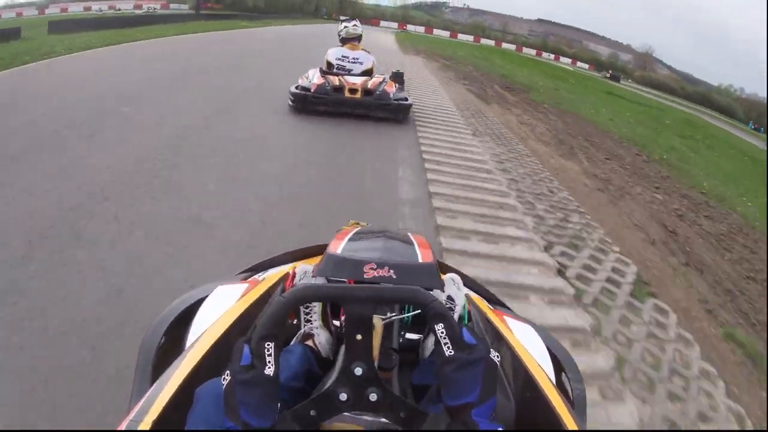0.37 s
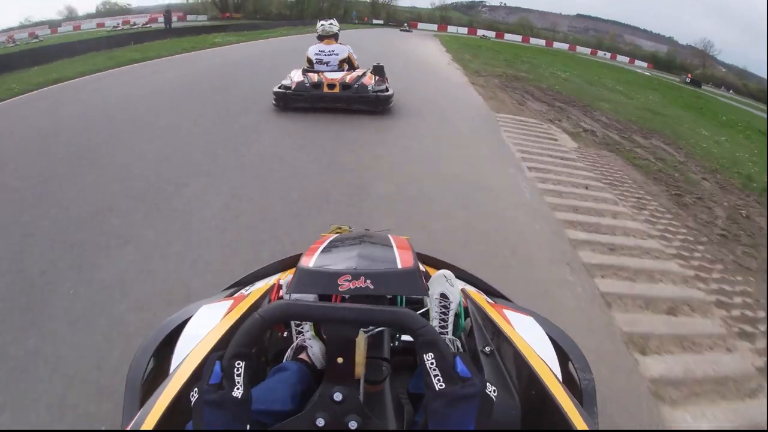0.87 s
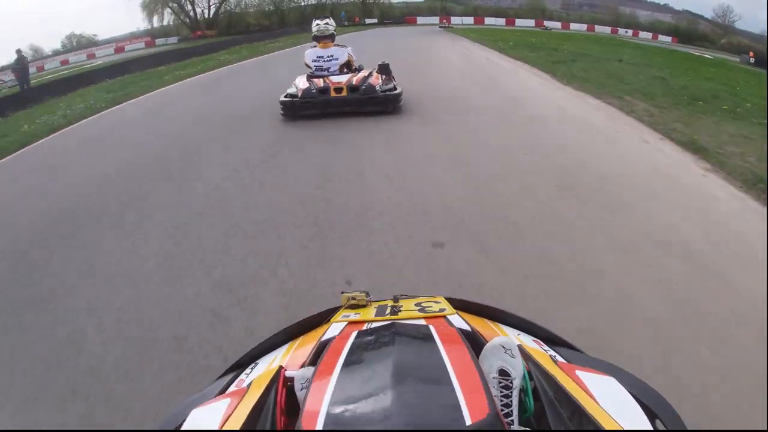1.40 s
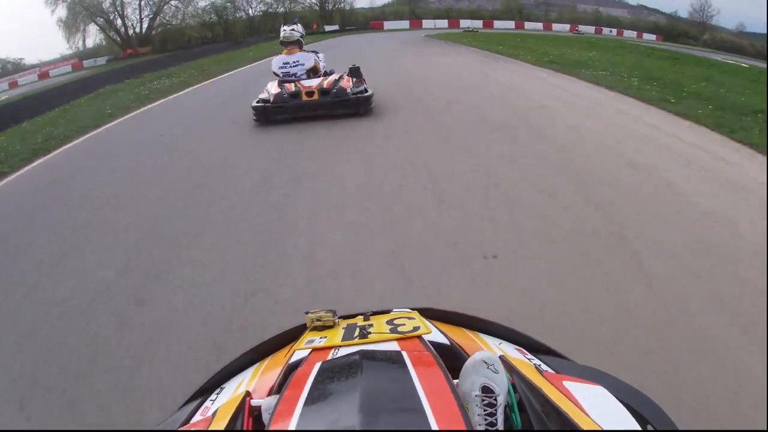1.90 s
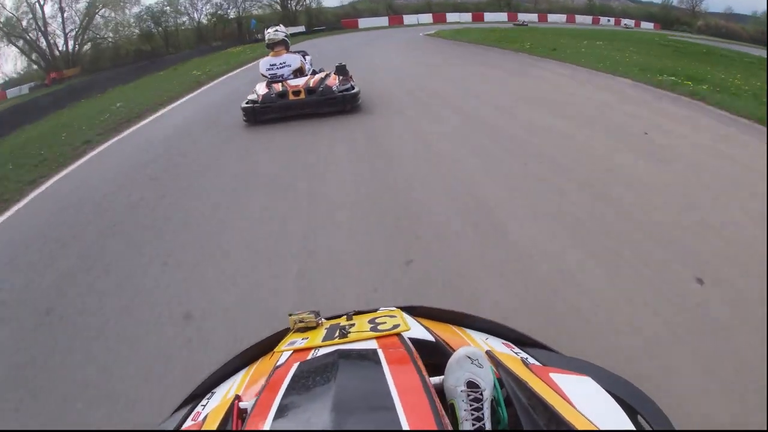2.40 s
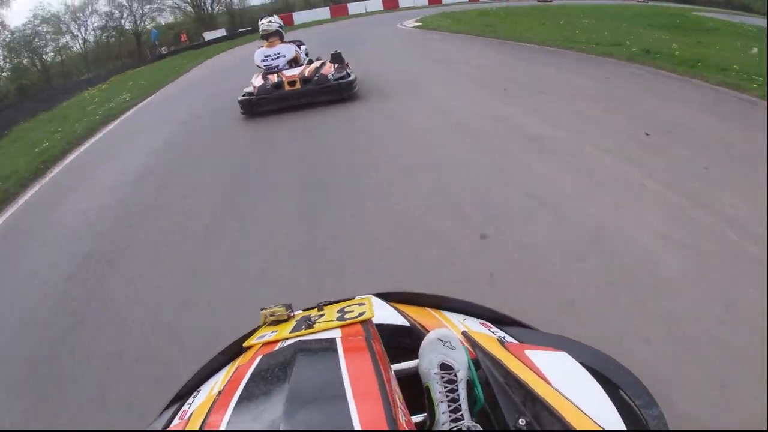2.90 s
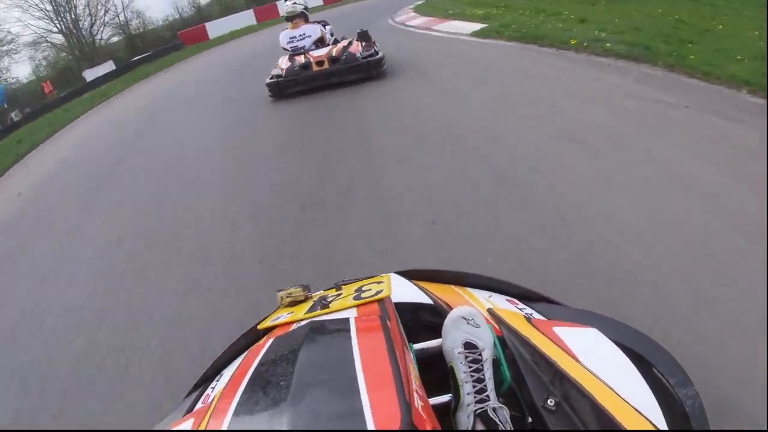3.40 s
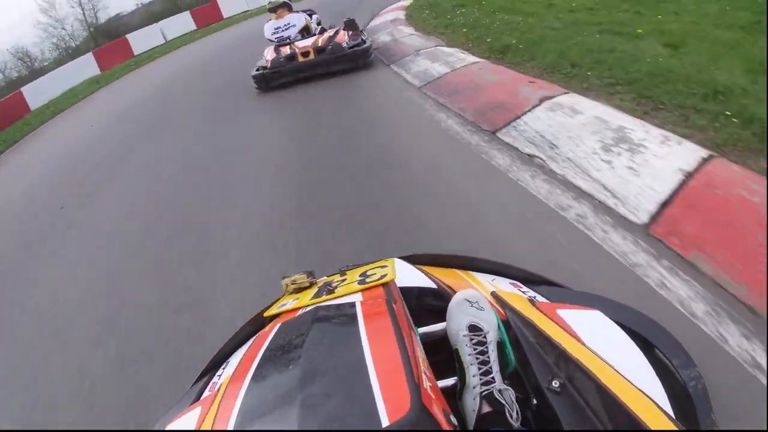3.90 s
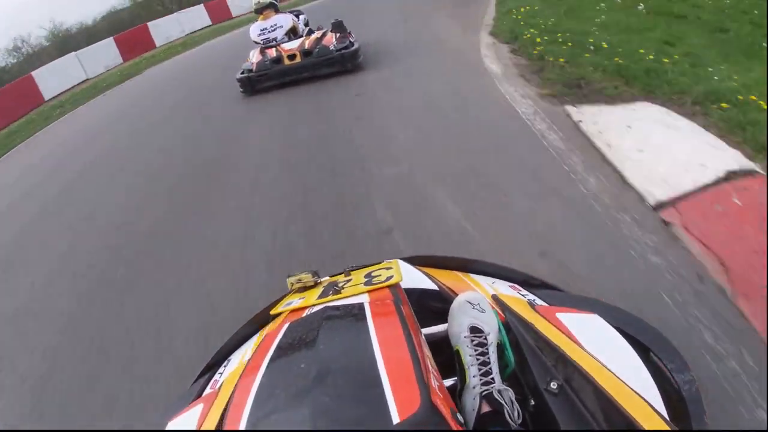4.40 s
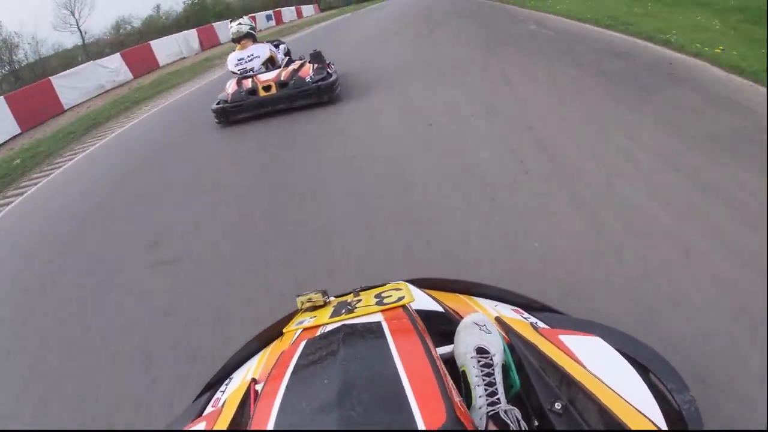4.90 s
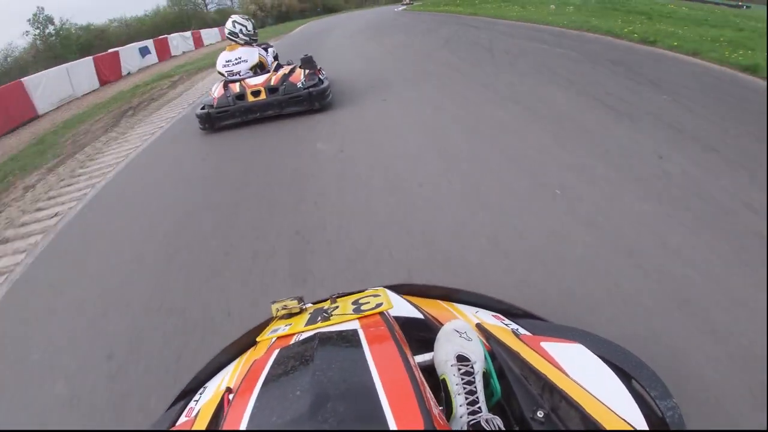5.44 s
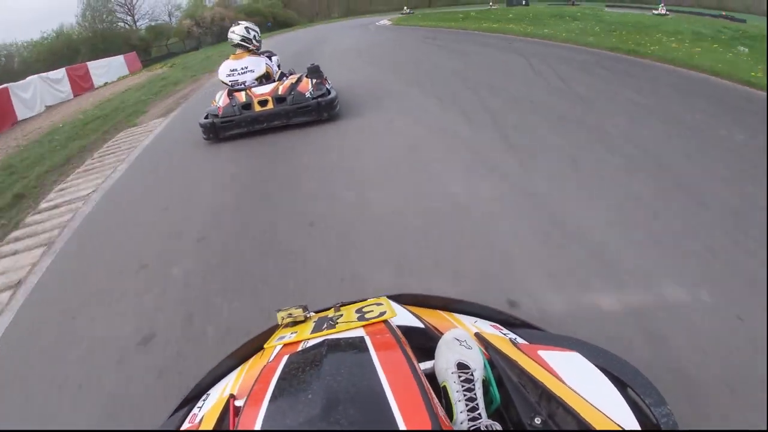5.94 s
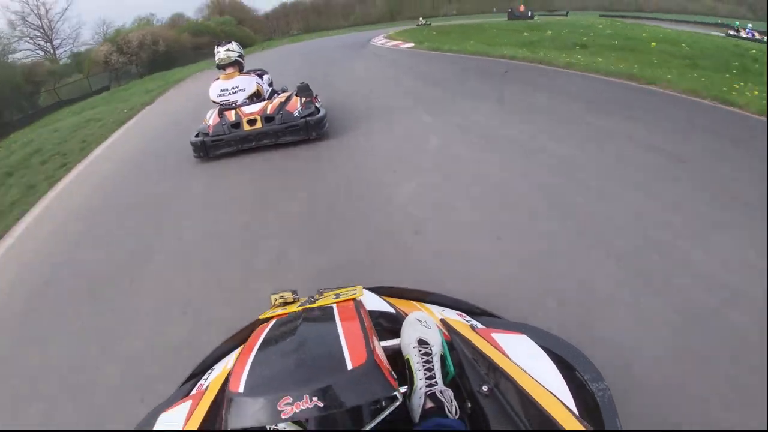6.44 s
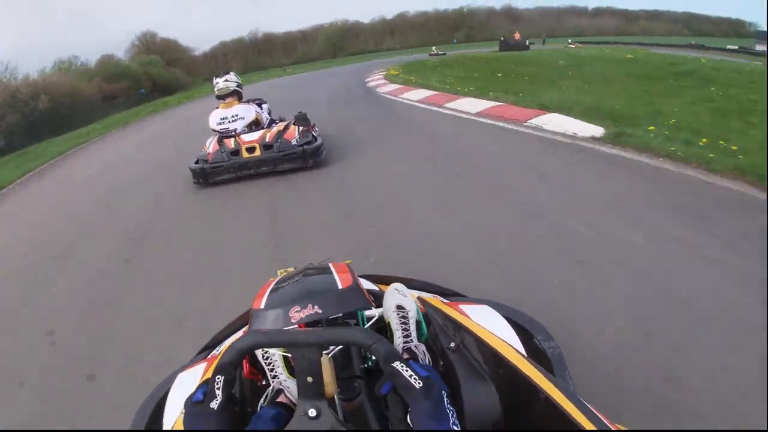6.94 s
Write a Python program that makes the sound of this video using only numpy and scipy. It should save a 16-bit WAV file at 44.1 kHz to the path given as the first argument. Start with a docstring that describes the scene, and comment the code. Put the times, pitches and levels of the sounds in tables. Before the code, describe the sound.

From the start, strong wind batters a microphone on a kart driver's helmet: deep lumpy rumble, a broad fluttering roar and a wide high hiss. Slaps of air, hard pops and gritty ticks crowd the first 1.3 seconds, especially around 0.1-0.3 and 0.85-0.9. A small engine is very faint at first, then drones low and unsteadily beneath, sagging in pitch towards 2.5 seconds. Between 2 and 3 the hiss narrows into a breathy whistle, and by 3.1 the roar has become quieter and duller as the kart slows. Short, faint, trembling tyre squeals come at 3.2-3.4 and 3.5-4.2, with a lower chirp at about 5.6. Slaps and pops continue unevenly, notably near 3.5, 4.2-4.4 and 5.8. The engine steadies at slightly higher pitch after 5, while the dull rumbling wind and thin hiss run to the end at 7 seconds.

```python
"""Wind buffets the microphone of a camera on a kart driver's helmet, through a long bend.
It is shaped noise: a lumpy rumble, a roar that dulls as the kart slows and a whistling hiss in the port.
Noise bursts make short slaps of air and ticks as of grit; single pressure pushes make pops.
The engine, a few wavering cosines, drones faintly beneath, and the tyres squeal in the turn:
trembling tones edged with noise."""
import sys
import numpy as np
from scipy import signal
from scipy.fft import rfft, irfft, next_fast_len
from scipy.io import wavfile
from scipy.ndimage import uniform_filter1d

SR = 44100
rng = np.random.default_rng(int(sys.argv[2]) if len(sys.argv) > 2 else 0)


def dump_mix(stems):
    """Bounce the given channels to the path in sys.argv[1] as a 16-bit WAV at rate SR."""
    frames = np.atleast_2d(stems).T  # one column per channel
    limited = np.clip(frames, -1, 1)  # hard clip at full scale
    pcm = np.round(limited * 32767).astype(np.int16)
    wavfile.write(sys.argv[1], SR, pcm)


def elevation(decibels):
    """Turn decibel levels (scalar or array-like) into linear amplitude ratios."""
    levels = np.asarray(decibels, float)
    return 10 ** (levels / 20)


N = 311346  # length in samples
T = np.arange(N) / SR
HOP = 128  # samples between steps of the roar and the gusts


def evened(x):
    """Scales to rms 1."""
    return x / np.sqrt(np.mean(x ** 2) + 1e-20)


def read(points, hz):
    """Reads a spectrum on a log-frequency axis."""
    f, value = np.transpose(points)
    return np.interp(np.log(hz + 1), np.log(f + 1), value)


def curve(rows, column, t):
    """Reads one column of a table over time."""
    rows = np.asarray(rows)
    return np.interp(t, rows[:, 0], rows[:, column])


def add(mix, s, sound):
    """Mixes a sound in at time s."""
    part = mix[round(s * SR):][:len(sound)]
    part += sound[:len(part)]


def wander(length, smooth):
    """Slow chance of rms 1, twice smoothed over a number of steps."""
    span = max(int(smooth), 1)
    once = uniform_filter1d(rng.standard_normal(length), span)
    return evened(uniform_filter1d(once, span))


def resonate(x, hz, width):
    """Shifts the curve hz down to zero, smooths twice, and shifts back: a steep resonance of gain 1."""
    turn = np.exp(2j * np.pi * np.cumsum(hz * np.ones(len(x))) / SR)
    r = np.exp(-np.pi * width / SR)
    smooth = signal.lfilter([(1 - r) ** 2], [1, -2 * r, r ** 2], x / turn + 1e-18)
    return 2 * (turn * smooth).real


def coloured(length, points):
    """Noise with the given spectrum, rms 1."""
    size = next_fast_len(length)
    gain = elevation(read(points, np.fft.rfftfreq(size, 1 / SR)))
    noise = irfft(rfft(rng.standard_normal(size)) * gain, size)
    return evened(noise[:length])


def burst(points, shape):
    """Coloured noise under an envelope, with the energy of that envelope."""
    x = coloured(len(shape), points) * shape
    return x * np.linalg.norm(shape) / np.linalg.norm(x)


# engine below the driver, before its wavering: time_s, shaft_turns_hz, level_db
ENGINE_RUN = [(0, 62.4, -49.5), (1.5, 57.7, -34.5), (2.5, 53.5, -34), (3.5, 57.04, -41), (4, 54.03, -39.5),
              (5, 58.43, -36), (6.2, 60.1, -34), (7.06, 59.9, -39.5)]
# orders of the exhaust: multiple of the shaft turns, relative level_db
EXHAUST_ORDERS = [(1, -2), (1.5, -3.5), (2, -0.5), (3, -19.5)]


def engine():
    """Low orders of a single cylinder, unsteady in pitch and level."""
    shaft_hz = curve(ENGINE_RUN, 1, T) * (1 + 0.03 * wander(N, 2520))
    turns = np.cumsum(shaft_hz) / SR
    orders = sum(elevation(db) * np.cos(2 * np.pi * (k * turns + rng.random())) for k, db in EXHAUST_ORDERS)
    return elevation(curve(ENGINE_RUN, 2, T) + 3.5 * wander(N, 1800)) * evened(orders)


# extra pitch at the onset, its decay time, the fades at both ends, rms wavering of the level
SQUEAL_BITE_HZ, SQUEAL_SETTLE_S, SQUEAL_EDGE_S, SQUEAL_FLUTTER_DB = 40, 0.04, 0.015, 1.5


def squeal(length, hz, db):
    """Rubber sticks and slips: a trembling tone with a fuzzy edge; it bites high and settles."""
    t = np.arange(0, length, 1 / SR)
    hz = hz + SQUEAL_BITE_HZ * np.exp(-t / SQUEAL_SETTLE_S)
    fuzz = evened(resonate(rng.standard_normal(len(t)), hz, 110))
    trembling_hz = hz * (1 + 0.009 * wander(len(t), 400))
    tone = np.sin(2 * np.pi * np.cumsum(trembling_hz) / SR)
    fade = np.clip(np.minimum(t, length - t) / SQUEAL_EDGE_S, 0, 1)
    level = elevation(db + SQUEAL_FLUTTER_DB * wander(len(t), 700))
    return level * evened(fuzz + 2 * tone) * fade


# tyres on the track in the bend: start_s, length_s, settled pitch_hz, level_db before flutter and fades
TYRE_SQUEALS = [(3.216, 0.075, 1640, -51.5), (3.29, .09, 1620, -57), (3.462, 0.12, 1660, -51),
                (3.581, 0.39, 1640, -52.5), (3.985, 0.2, 1645, -58), (5.635, 0.11, 1060, -56)]


def tyres():
    """The tyres' squeals, each where it starts in the bend."""
    out = np.zeros(N)
    for start, length, hz, db in TYRE_SQUEALS:
        add(out, start, squeal(length, hz, db))
    return out


# air met by the helmet: time_s, head-on stream level_db against the start, side wind level_db
AIR_STREAM = [(0, -0.5, -1), (.5, -0.5, 0.5), (1, -1, -1), (1.5, -3, -1.5), (2, -2.5, -0.5), (2.6, -3, .5),
              (3.1, -6, 2), (3.6, -6.5, 2.5), (4.2, -8.5, 2), (4.8, -8, 1), (5.4, -8.5, 2), (6, -9, 1),
              (6.5, -9.5, 0), (7.06, -8, 0)]


def head_on_db(t):
    """Strength of the stream met head-on."""
    return curve(AIR_STREAM, 1, t)


def side_wind_db(t):
    """Strength of the wind from the side."""
    return curve(AIR_STREAM, 2, t)


# gusts at the helmet: centre_s, spread_s (standard deviation), lift_db, eddy pitch_hz
WIND_GUSTS = [(0.03, 0.024, 6, 60), (0.136, 0.016, 7, 60), (0.202, 0.05, 1, 1500), (0.28, 0.047, 3, 2380),
              (0.54, 0.057, 2, 210), (0.754, 0.019, 4, 4000), (0.853, 0.055, 6.5, 60),
              (0.867, 0.0071, 8.5, 1200), (1.104, 0.0072, 2, 2700), (1.11, 0.013, 9, 150),
              (1.283, 0.014, 7, 120), (1.882, 0.023, 8, 210), (2.483, 0.012, 5, 210),
              (2.739, 0.063, 1, 2700), (2.831, 0.017, 3, 120), (3.168, 0.0049, 6.5, 1610),
              (3.201, 0.013, 7.5, 210), (3.326, 0.015, 6.5, 120), (3.537, 0.0056, 11, 350),
              (3.615, 0.029, 4, 1610), (3.747, 0.009, 9, 210), (3.943, 0.0069, 8, 750),
              (4.241, 0.0095, 5.5, 350), (4.247, 0.0082, 4, 2000), (0.42, 0.03, 1, 2700),
              (5.613, 0.015, 2.5, 2700), (4.352, 0.011, 6.5, 1000), (4.616, 0.012, 9.5, 120),
              (4.729, 0.0049, 7.5, 1600), (4.797, 0.018, 3, 1600), (4.976, 0.012, 7, 350),
              (4.986, 0.086, 2, 2700), (5.235, 0.0045, 7, 210), (5.332, 0.017, 2, 350),
              (5.57, 0.05, 3, 500), (5.788, 0.007, 4, 4000), (5.789, 0.0095, 10, 696),
              (6.219, 0.01, 5, 212), (6.315, 0.01, 7.5, 210), (6.717, 0.0058, 6, 500),
              (6.753, 0.011, 1.5, 60), (6.967, 0.053, 1.5, 1000)]
# lulls between them: centre_s, spread_s (standard deviation), negative lift_db, eddy pitch_hz
WIND_LULLS = [(0.055, 0.029, -5, 352), (0.52, 0.044, -5, 60), (0.521, 0.021, -5, 1000),
              (0.647, 0.014, -4, 1000), (0.812, 0.013, -4.5, 1600), (0.958, 0.018, -18, 60),
              (1.06, 0.02, -4.5, 1600), (1.218, 0.013, -6, 121), (1.34, 0.014, -17, 120),
              (1.404, 0.048, -2, 1600), (1.467, 0.015, -10, 60), (1.58, 0.036, -1.5, 210),
              (1.943, 0.014, -9, 120), (2.04, 0.018, -5, 120), (2.45, 0.012, -7, 60),
              (2.55, 0.027, -17, 61), (2.653, 0.025, -8, 60), (2.906, 0.014, -10, 120),
              (2.938, 0.021, -4, 1590), (3.053, 0.022, -2.5, 2700), (3.226, 0.0087, -6, 1594),
              (3.254, 0.033, -5.5, 350), (3.375, 0.021, -19, 120), (3.417, 0.058, -4, 1590),
              (3.702, 0.0068, -9.5, 500), (3.724, 0.027, -2.5, 2700), (3.846, 0.0086, -5, 352),
              (3.965, 0.0087, -10, 1610), (3.996, 0.017, -7, 210), (4.168, 0.01, -5, 350),
              (4.288, 0.008, -4, 1000), (4.5, 0.1, -5.5, 120), (4.664, 0.0083, -5.5, 1000),
              (5.26, 0.041, -5.5, 2700), (5.388, 0.014, -5.5, 350), (5.657, 0.016, -5.5, 2000),
              (5.68, 0.025, -4, 210), (5.743, 0.03, -6.5, 2000), (5.885, 0.02, -4.5, 346),
              (5.994, 0.012, -4, 2700), (6.145, 0.02, -8, 210), (6.356, 0.041, -1, 5600),
              (6.38, 0.021, -18, 118), (6.63, 0.027, -9, 120), (6.976, 0.0087, -14, 60),
              (7.042, 0.011, -15, 60)]
REACH_OCT = 0.98  # standard deviation of a gust or lull around its pitch


def swing_db(t, hz):
    """Gusts and lulls as felt at the given pitches: each a bell in time and in octaves."""
    s, spread, db, centre = np.transpose(WIND_GUSTS + WIND_LULLS)
    bells = db[:, None] * np.exp(-0.5 * ((t - s[:, None]) / spread[:, None]) ** 2)
    octaves = np.log2((np.atleast_1d(hz)[:, None] + 1) / centre)
    return np.exp(-0.5 * (octaves / REACH_OCT) ** 2) @ bells


def swing_at(hz):
    """The same for one pitch, sample by sample."""
    return np.interp(T, T[::HOP], swing_db(T[::HOP], hz)[0])


# sharp ticks, as of grit on the casing: start_s, nominal peak level_db before the dulling
GRIT_TICKS = [(0.388, -28), (0.5631, -34), (0.8585, -25), (0.871, -26), (0.8948, -33), (1.0979, -27),
              (1.1767, -26), (1.7833, -34), (1.8143, -30), (2.6698, -37), (2.9826, -34), (3.1695, -33),
              (3.252, -35), (3.9475, -37), (3.9998, -34), (4.0895, -34), (4.1814, -42), (4.2406, -33),
              (4.3173, -33.5), (4.7696, -38), (4.9641, -34.5), (5.0652, -36), (5.3413, -32), (5.5034, -41),
              (5.691, -44), (5.7864, -35), (5.803, -33), (6.7461, -36), (6.8394, -46)]
# spectrum of a tick: pitch_hz, relative level_db per Hz
TICK_SPECTRUM = [(250, -30.5), (600, 0.5), (1500, -5), (3000, -12.5), (5500, -25.5), (7000, -38.5),
                 (12000, -91.5)]
TICK_S, TICK_RISE_S, TICK_CREST_DB = 0.0028, 0.00054, 1  # decay, rise, allowance for noise peaks


def ticks():
    """Short dry ticks with a quick front, dulled above the port's reach."""
    out = np.zeros(N)
    t = np.arange(768) / SR
    shape = (1 - np.exp(-(t / TICK_RISE_S) ** 2)) * np.exp(-t / TICK_S)
    for s, db in GRIT_TICKS:
        add(out, s, elevation(db - TICK_CREST_DB) * burst(TICK_SPECTRUM, shape))
    return signal.sosfilt(signal.butter(6, 6300, fs=SR, output="sos"), out)


# eddies bursting on the microphone port: centre_s, level_db (the peak lies 3.5 dB lower)
PORT_POPS = [(0.048, -21), (0.106, -21), (0.218, -20), (0.253, -13), (0.4, -19), (0.902, -18), (1.109, -21),
             (1.122, -19), (1.853, -20), (1.879, -16), (1.899, -20), (2.175, -21), (3.14, -18),
             (3.174, -21), (3.336, -21.5), (3.533, -14), (3.744, -15.5), (3.92, -21), (4.244, -15),
             (4.3625, -13), (4.616, -24), (4.966, -23), (5.311, -20), (5.505, -22), (5.78, -18),
             (5.804, -14), (6.715, -24), (6.953, -22)]
POP_S = 0.0006  # standard deviation of the narrow bell


def pops():
    """Each pop is one quick push or suck with a shallow rebound on either side."""
    out = np.zeros(N)
    u = np.arange(-256, 256) / SR / POP_S
    # a wider bell of equal area, taken away, leaves the rebounds
    push = np.exp(-u ** 2 / 2) - np.exp(-(u / 3) ** 2 / 2) / 3
    for (s, db), sign in zip(PORT_POPS, rng.choice([-1., 1.], len(PORT_POPS))):
        add(out, s - 256 / SR, sign * elevation(db) * push)
    return out


# slaps of air on the microphone: start_s, nominal puff peak level_db, crack level_db
AIR_SLAPS = [(0.044, -16, -32.5), (0.101, -11.5, -34), (0.134, -14, -29.5), (0.162, -20, -31),
             (0.184, -17, -45), (0.225, -12.5, -31), (0.364, -17.5, -35.5), (0.519, -25, -43),
             (0.759, -17, -32), (0.775, -18, -33), (0.853, -16, -31), (0.866, -16, -29), (0.889, -23, -34),
             (0.9, -24, -35), (1.097, -25, -37), (1.257, -22, -39), (2.283, -26, -39), (2.968, -27, -46.5),
             (3.137, -22, -42), (3.165, -27, -39), (3.357, -31, -40.5), (3.519, -19, -49), (3.6, -17, -41),
             (3.637, -19, -45), (3.946, -22, -46), (4.232, -24, -42), (4.319, -31, -41), (4.352, -24, -46),
             (5.309, -21, -40), (5.339, -19, -48), (5.502, -21, -43), (5.574, -22, -41), (5.615, -28, -44),
             (5.689, -22, -55), (5.775, -28, -39), (5.797, -30, -40), (6.303, -31, -54), (6.712, -24, -43),
             (6.838, -34, -58)]
# body of a slap: pitch_hz, relative level_db per Hz
PUFF_SPECTRUM = [(150, -37.5), (300, 1), (450, 6.5), (1100, -12), (1600, -25), (3000, -60.5), (8000, -120)]
# edge of a slap: pitch_hz, relative level_db per Hz
CRACK_SPECTRUM = [(450, -38.5), (900, -0.5), (1400, 2), (2500, -8), (4000, -15.5), (6000, -28.5),
                  (7200, -48), (12000, -99)]
SLAP_S, PUFF_CREST_DB = 0.0059, 9  # decay of the puff, allowance for its peaks


def slaps():
    """Each slap is a short dull puff together with a brighter crack."""
    out = np.zeros(N)
    t = np.arange(2048) / SR / SLAP_S
    rise = 1 - np.exp(-(5.6 * t) ** 2)
    for s, db, crack_db in AIR_SLAPS:
        puff = burst(PUFF_SPECTRUM, rise * np.exp(-t ** 1.8))
        crack = burst(CRACK_SPECTRUM, rise * np.exp(-(0.72 * t) ** 1.9))
        add(out, s, elevation(db - PUFF_CREST_DB) * puff + elevation(crack_db) * crack)
    return out


# cavity modes of the microphone port: factor on the whistle, width_hz, level_db, share of the lean
PORT_MODES = [(.925, 170.5, -1.5, -1), (0.999, 170, 1.5, 0), (1.045, 258, -6.5, 0.58)]
# the whistle drifts as the head turns in the stream:
# time_s, pitch_hz before a slight wavering, sharpness 0-1, lean_db from the low mode to the high one
WHISTLE_DRIFT = [(0, 5680, 0, 1.5), (1.9, 5660, 0, 2.5), (2.2, 5420, 0.4, 4.5), (2.5, 5420, 0.7, 5.5),
                 (2.8, 5550, 0.8, 6.5), (2.95, 5590, .85, 3.5), (3.25, 5610, 0.9, 3),
                 (3.45, 5620, 0.7, -1.5), (4.3, 5660, 0.67, 0.5), (4.7, 5620, 0.4, 0),
                 (5.1, 5620, 0.3, -1.5), (5.35, 5600, 0.1, 0), (5.65, 5400, 0.4, 2.5),
                 (6.2, 5430, 0.5, 1.5), (7.06, 5500, 0.7, 1)]
HISS_DB, PORT_HZ = -57.5, 5600  # base level, pitch at which it feels the gusts
WHISTLE_LIFT_DB = 2.5  # a sharp whistle is louder than the blur


def port_hiss():
    """Air across the port makes its cavity whistle; head-on the whistle blurs into one wide band."""
    air = rng.standard_normal(N) * elevation(1.4 * wander(N, 400))
    hz = curve(WHISTLE_DRIFT, 1, T) * (1 + 0.004 * wander(N, 2500))
    sharp, lean_db = curve(WHISTLE_DRIFT, 2, T), curve(WHISTLE_DRIFT, 3, T)
    modes = np.zeros(N)
    for k, width, db, share in PORT_MODES:
        modes += elevation(db + share * lean_db) * resonate(air, k * hz, width) / np.sqrt(width)
    blur = coloured(N, [(3500, -40.5), (4900, -2), (5500, 1.5), (5950, -4.0),
                        (6500, -25.5), (8000, -69.5), (12000, -110)])
    level_db = HISS_DB + head_on_db(T) + swing_at(PORT_HZ) + WHISTLE_LIFT_DB * sharp
    level_db += 0.5 * wander(N, 1500)
    return elevation(level_db) * (np.sqrt(sharp) * evened(modes) + np.sqrt(1 - sharp) * blur)


# small eddies close to the microphone at full speed: pitch_hz, relative level_db per Hz
FAST_SPECTRUM = [(220, -21), (330, -3.5), (450, -6.5), (900, -11.5), (1700, -18.5), (3050, -26),
                 (4500, -34), (5900, -38), (7000, -53.5), (10300, -64), (11800, -78)]
# small eddies in the bend: pitch_hz, relative level_db per Hz
SLOW_SPECTRUM = [(220, -20.5), (330, -4), (400, -7.5), (480, -12), (1100, -22), (1900, -28.5),
                 (3090, -34.5), (4550, -40.5), (5900, -46.5), (7000, -60), (9800, -71), (11000, -88.5)]
# slowing for the bend: time_s, share of the slow roar 0-1
BEND_SLOWING = [(0, 0.08), (1.5, 0.1), (2.7, 0.53), (3.1, 0.94), (7.06, 1)]
# flutter of the roar: pitch_hz, rms depth_db
ROAR_FLUTTER = [(200, 3), (600, 1.1), (2000, 1.06), (6000, 1.4)]
ROAR_DB = -31.5  # base level, set by the 400-1300 Hz band


def roar():
    """Small eddies: short noise spectra with patches; a quick flutter shakes the lowest pitches most."""
    frames, hz = N // HOP + 8, np.fft.rfftfreq(512, 1 / SR)
    t = np.arange(frames) * HOP / SR
    a, b, patches = rng.standard_normal((frames, len(hz), 3)).T
    patches = uniform_filter1d(uniform_filter1d(patches, size=8, axis=0), size=8, axis=1)
    slow = curve(BEND_SLOWING, 1, t)
    fast_db, slow_db = (read(s, hz)[:, None] for s in (FAST_SPECTRUM, SLOW_SPECTRUM))
    shape = elevation((1 - slow) * fast_db + slow * slow_db)
    middle = shape[(hz > 400) & (hz < 1300)]
    shape /= np.sqrt((middle ** 2).sum(axis=0))
    flutter_db = read(ROAR_FLUTTER, hz)[:, None] * wander(frames, 2.5)
    field_db = ROAR_DB + head_on_db(t) + swing_db(t, hz) + flutter_db + 0.79 * evened(patches)
    spectra = (a + 1j * b) * shape * elevation(field_db)
    return signal.istft(spectra, nperseg=512, noverlap=512 - HOP)[1][:N]


# large eddies on the microphone, before saturation and dulling: pitch_hz, relative level_db per Hz
RUMBLE_SPECTRUM = [(9, -30.5), (15, -1.5), (32, -1), (80, 0.5), (125, -4), (150, -11), (250, -32)]
# middle eddies: pitch_hz, relative level_db per Hz
THUMP_SPECTRUM = [(60, -63), (100, -24), (140, -0.5), (200, -3), (300, -9), (360, -19), (600, -44.5),
                  (1500, -110)]
RUMBLE_DB, THUMP_DB = -25.5, -29.5  # base levels
RUMBLE_HZ, THUMP_HZ = 60, 210  # pitches at which they feel the gusts
THUMP_HEAD, THUMP_SIDE = 0.58, 0.99  # share of each stream's dB that the thumps follow


def rumble():
    """Big eddies press on the diaphragm, which saturates and evens their lumps; middle ones thump in surges."""
    lumps = evened(np.tanh(0.44 * coloured(N, RUMBLE_SPECTRUM)))
    smooth = signal.sosfilt(signal.butter(3, 190, fs=SR, output="sos"), lumps)
    thumps = evened(coloured(N, THUMP_SPECTRUM) * elevation(1.57 * wander(N, 560)))
    side_db = side_wind_db(T)
    rumble_db = RUMBLE_DB + side_db + swing_at(RUMBLE_HZ)
    thump_db = THUMP_DB + THUMP_HEAD * head_on_db(T) + THUMP_SIDE * side_db + swing_at(THUMP_HZ)
    return elevation(rumble_db) * smooth + elevation(thump_db) * thumps


def scene():
    """Wind layers, engine and tyres meet at one microphone."""
    wind = rumble() + roar() + port_hiss() + slaps() + pops() + ticks()
    return (wind + engine() + tyres())[None]


def band_limit(x):
    """A steep low-pass at the top of the band."""
    return signal.sosfilt(signal.butter(12, 12000, fs=SR, output="sos"), x)


# threshold, share of the excess dB taken off, fall of the held excess
CEILING_DB, SQUEEZE, RECOVER_DB_PER_S = -21, 0.45, 200


def record(dry):
    """A quick limiter pulls down the surges and the microphone stage rounds off the peaks."""
    power_db = 10 * np.log10(abs(uniform_filter1d(dry[0] ** 2, size=600)) + 1e-12)
    fall = T * RECOVER_DB_PER_S
    # peaks are held, then let down at a steady rate
    held_db = np.maximum.accumulate(power_db + fall) - fall
    over_db = np.maximum(held_db - CEILING_DB, 0)
    limited = dry / elevation(SQUEEZE * uniform_filter1d(over_db, size=300))
    knee = 0.59
    rounded = knee * np.tanh(limited / knee)
    return band_limit(rounded)


dry = scene()
out = record(dry)
dump_mix(out)
```